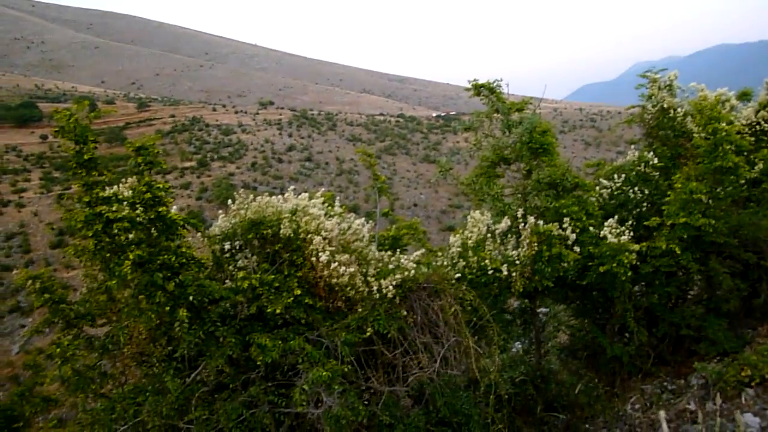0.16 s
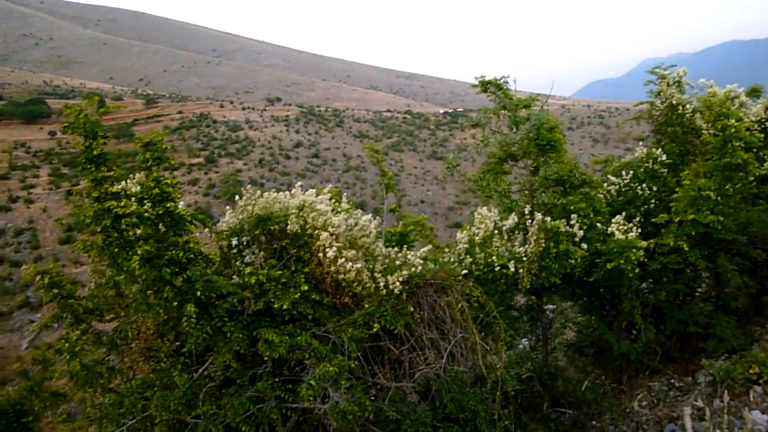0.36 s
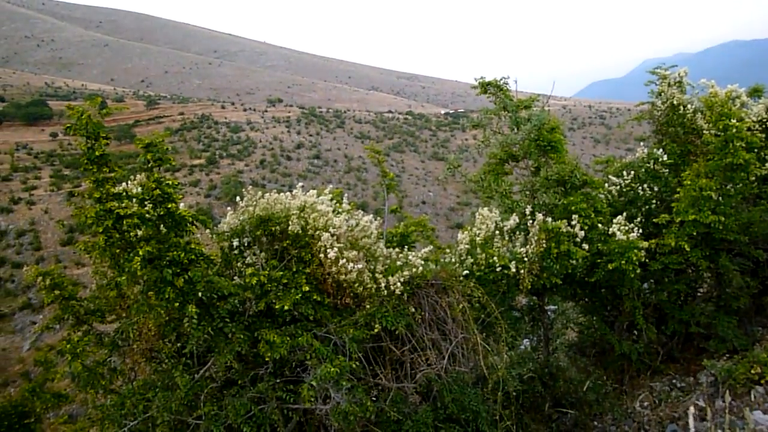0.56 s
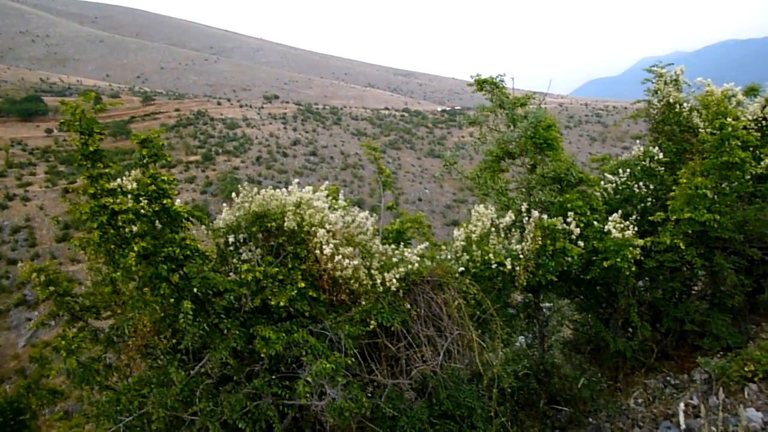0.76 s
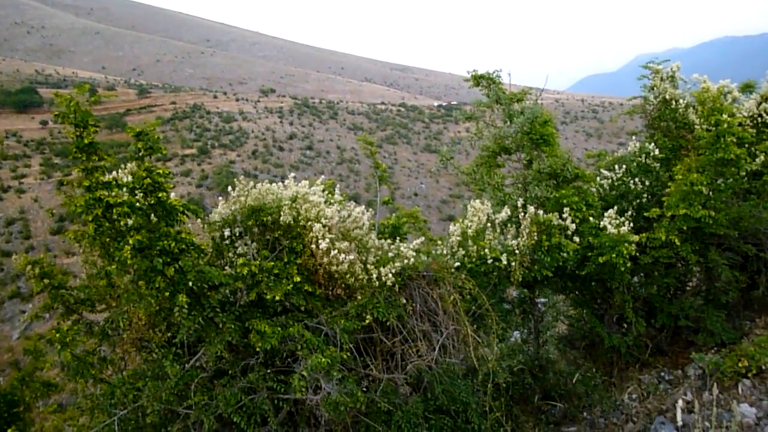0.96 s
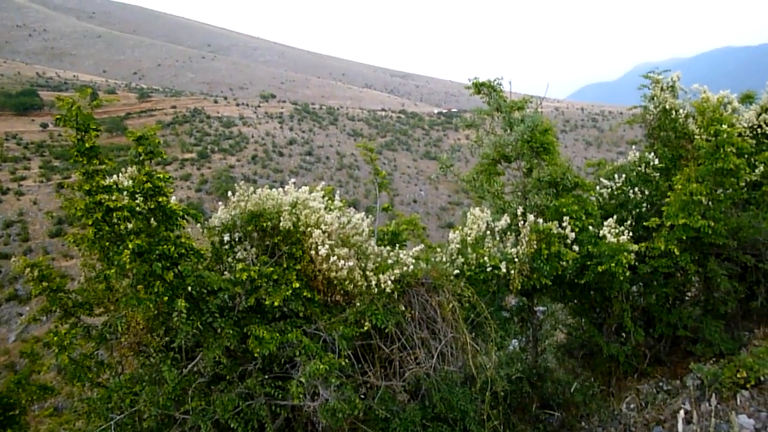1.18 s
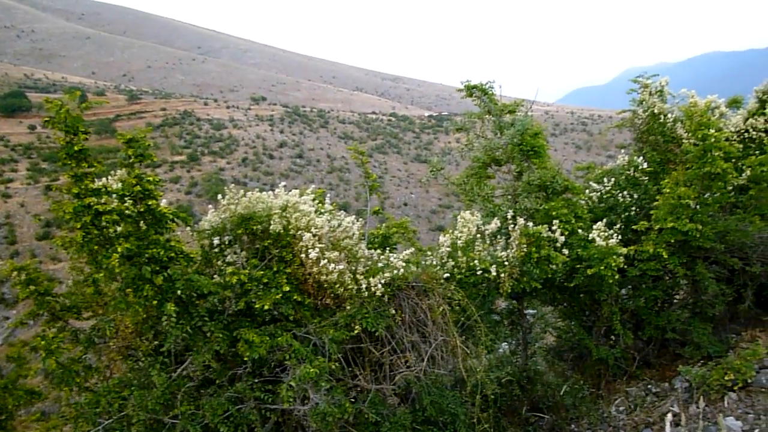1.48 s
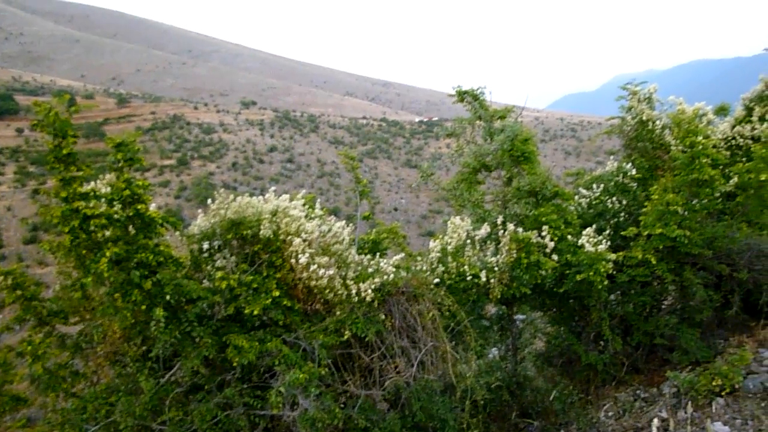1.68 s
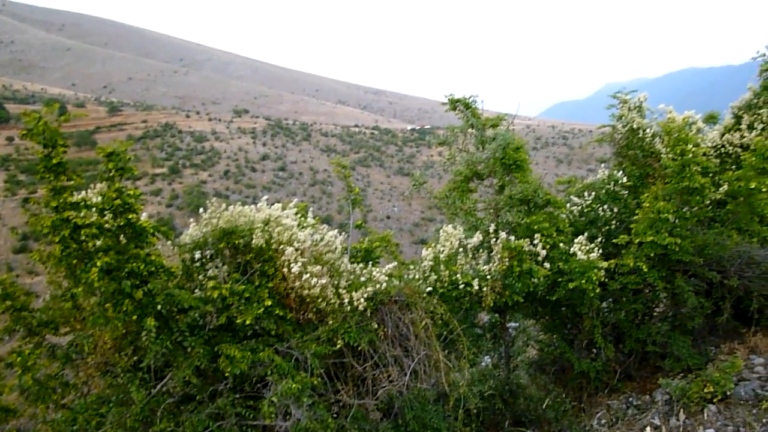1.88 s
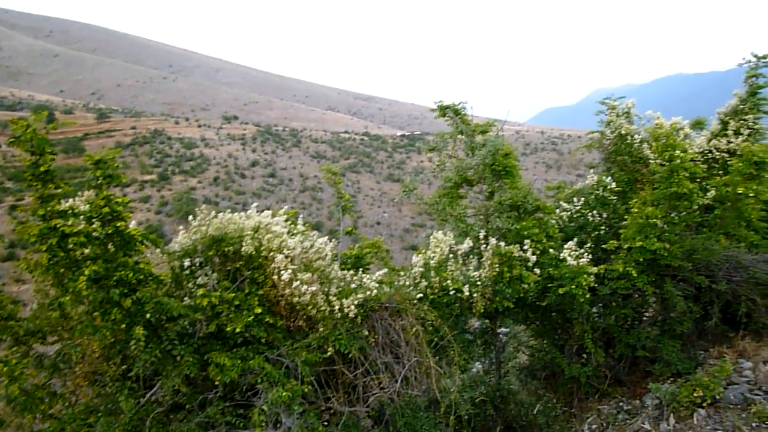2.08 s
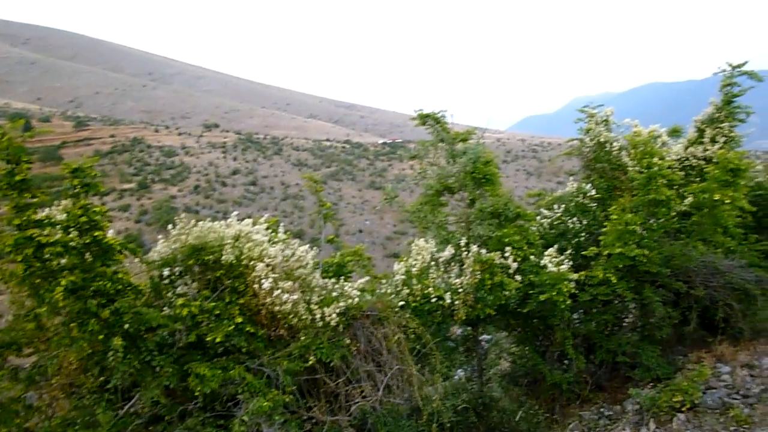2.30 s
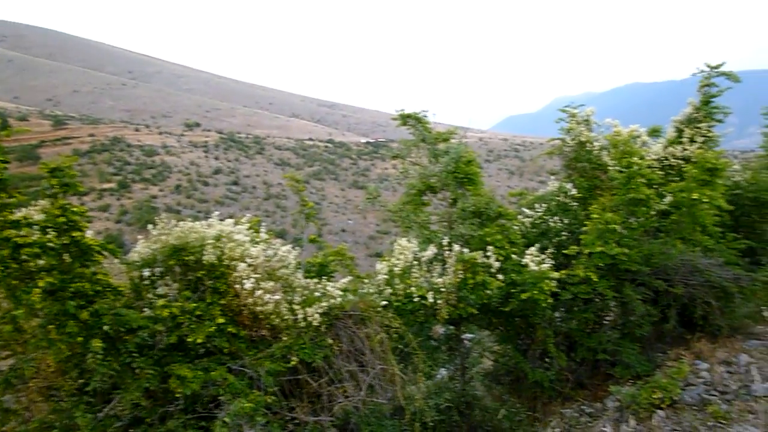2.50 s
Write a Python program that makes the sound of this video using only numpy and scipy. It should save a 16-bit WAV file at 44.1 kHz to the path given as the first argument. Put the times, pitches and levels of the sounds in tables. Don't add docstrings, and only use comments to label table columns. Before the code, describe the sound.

Low, fluttering wind rumble thumps against an open microphone, with one knock and faint sheep bells

```python
import sys
import numpy as np
from scipy import signal
from scipy.fft import rfft, irfft
from scipy.io import wavfile
from scipy.ndimage import uniform_filter1d

SR = 44100
rng = np.random.default_rng(int(sys.argv[2]) if len(sys.argv) > 2 else 0)


def file_out(sig):
    cols = np.atleast_2d(sig).T
    lim = np.clip(cols, -1, 1)
    pcm = np.round(lim * 32767).astype(np.int16)
    wavfile.write(sys.argv[1], SR, pcm)


def elevation(decibels):
    levels = np.asarray(decibels, float)
    return 10 ** (levels / 20)


N = 116865
T = np.arange(N) / SR


def walk(rate_hz):
    hold = int(SR / rate_hz)
    steps = np.repeat(rng.standard_normal(N // hold + 1), hold)
    return 1.08 * uniform_filter1d(uniform_filter1d(steps, hold), hold)[:N]


def unit(x):
    return x / np.sqrt(np.mean(x ** 2))


# (frequency [Hz], level [dB])
WHINE_LINES = [(12625, -98), (13212, -96), (13333, -90.5), (13905, -95.5)]


def whine():
    return sum(elevation(db + 3.0 * walk(6.6)) * np.sin(2 * np.pi * hz * T) for hz, db in WHINE_LINES)


# (frequency [Hz], density [dB per Hz])
AIR_SPECTRUM = [(40, 2.5), (200, 1.5), (700, -0.5), (2000, -8.5), (4000, -13), (7000, -18.5),
                (10000, -21.5), (16000, -27.5)]


def air():
    level_db, flicker_db = -55.5, 0.6
    hz = np.arange(N // 2 + 1) * SR / N + 1
    table_hz, table_db = np.array(AIR_SPECTRUM).T
    density_db = np.interp(np.log(hz), np.log(table_hz), table_db)
    spectrum = rfft(rng.standard_normal(N)) * elevation(density_db)
    hiss, shared = 0, walk(9.32)
    for octave in range(5, 15):
        share = np.clip(1 - abs(np.log2(hz) - octave), 0, 1)
        band = irfft(spectrum * share, N)
        hiss = hiss + band * elevation(flicker_db * (shared + 0.7 * walk(8)))
    return elevation(level_db) * unit(hiss)


# (time [s], level [dB])
GAIN_CURVE = [(0, -68), (.33, -67.5), (.42, -66.5), (.46, -71.5), (.7, -71.5), (.72, -74), (1, -71),
              (1.23, -72.5), (1.4, -74.5), (1.7, -71), (2.05, -70), (2.4, -68), (2.65, -67)]


def recorder_gain():
    return elevation(np.interp(T, *np.array(GAIN_CURVE).T) + 70)


def ring(start_s, hz, db, t60_s):
    t = np.maximum(T - start_s, 0)
    onset = np.minimum(t / 0.0016, 1)
    return elevation(db - 60 * t / t60_s) * np.sin(2 * np.pi * hz * t) * onset


# (frequency [Hz], level [dB], t60 [s])
BELL_PARTIALS = [(3457, -3, 1.5), (3578, -9, .6), (3720, 2, .035), (3950, 1, .035), (6468, 0, .22),
                 (6452, -9, .22), (7063, -20, .3), (9560, -12, .14), (10150, -11, .14)]
# (time [s], level [dB])
BELL_STROKES = [
    (.998, -56),
]


def near_bell():
    out = 0
    for start_s, hit_db in BELL_STROKES:
        damp = np.clip((start_s + 0.165 - T) / 0.02, 0, 1)
        for hz, db, t60_s in BELL_PARTIALS:
            out = out + ring(start_s, hz, db + hit_db, t60_s) * damp
    return out


# (time [s], frequency [Hz], level
# [dB], t60 [s])
FAR_PARTIALS = [(.07, 1405, -62, .6), (.24, 1324, -65, .3), (1.185, 3578, -66, .35), (1.22, 6468, -68, .12),
                (1.94, 815, -62, .3), (2.015, 1365, -57, .7), (2.215, 4553, -67, .5), (2.45, 1174, -63, .5),
                (2.49, 830, -62, .3)]


def far_bells():
    return sum(ring(*row) for row in FAR_PARTIALS)


def eddies(when_s, db, ms, lean):
    at = np.round(when_s * SR).astype(int)[:, None] + np.arange(-512, 512)
    u = (at / SR - when_s[:, None]) * 1000 / ms[:, None]
    shape = -elevation(db)[:, None] * (1 + np.reshape(lean, (-1, 1)) * u) * np.exp(-u ** 2 / 2)
    return np.bincount(np.clip(at + 1, 0, N + 1).ravel(), shape.ravel(), N + 2)[1:N + 1]


def knock():
    knock_s, highpass_hz = 0.7029, 500
    tick = eddies(np.full(2, knock_s), np.array([-37, -25]), np.array([0.055, 0.16]), 0)
    shove = eddies(np.array([knock_s - 0.001]), np.array([-13.]), np.array([0.55]), 0)
    return signal.sosfilt(signal.butter(1, highpass_hz, "high", fs=SR, output="sos"), tick) - shove


# (time [s], length [s], level [dB])
WIND_PUFFS = [(0, 0.025, -40.5), (0.094, 0.044, -40), (0.126, 0.076, -33.5), (0.209, 0.043, -22),
              (0.267, 0.038, -31), (0.28, 0.12, -37), (0.373, 0.028, -25), (0.422, 0.068, -20.5),
              (.5, 0.36, -23), (0.869, 0.19, -23), (1.07, 0.052, -20), (1.126, 0.07, -27.5),
              (1.199, 0.075, -19), (1.269, .18, -22.5), (1.456, 0.039, -32.5), (1.514, .18, -23.5),
              (1.698, 0.048, -35.5), (1.73, 0.049, -27.5), (1.784, 0.061, -37), (1.92, 0.029, -39),
              (1.826, 0.081, -27.5), (1.909, 0.051, -34.5), (1.956, 0.056, -31), (1.997, 0.026, -24),
              (2.043, .14, -24), (2.194, 0.014, -27.5), (2.228, .15, -25.5), (2.434, 0.046, -36),
              (2.586, 0.018, -34), (2.596, 0.043, -38)]


def gust_db():
    rise_s, fall_s, calm_db = 0.0079, 0.017, -57
    power = elevation(calm_db) ** 2
    for start_s, hold_s, db in WIND_PUFFS:
        rise = (1 + np.tanh((T - start_s) / rise_s)) / 2
        fall = (1 + np.tanh((start_s + hold_s - T) / fall_s)) / 2
        power = power + (elevation(db) * rise * fall) ** 2
    return 10 * np.log10(power)


def sway(gust):
    level_db, lowpass_hz = -3, 65
    lowpass = signal.butter(4, lowpass_hz, fs=SR, output="sos")
    rumble = unit(signal.sosfilt(lowpass, rng.standard_normal(N)))
    return elevation(uniform_filter1d(gust, int(0.018 * SR)) + level_db + 2.0 * walk(12)) * rumble


# (time [s], peak level [dB], width [ms])
MORE_SUCTIONS = [(0.2414, -18, 2.57), (0.5122, -21.5, 2.3), (0.567, -20.5, 2.1), (1.1972, -13, 4),
                 (1.2831, -19.5, 2.5), (1.317, -16, 1.6), (1.4338, -19, 2.6), (1.564, -18, 1.74),
                 (1.5743, -15, 2.6), (1.6242, -15.5, 3.4), (1.64, -17, 2.23), (1.865, -17.5, 3.65),
                 (2.003, -23, 2.57), (2.0745, -15.5, 4.2), (2.143, -13.5, 3.8), (2.2372, -13.5, 2.9),
                 (2.2579, -19.5, 1.9), (2.2847, -17, 2.65), (2.3527, -13, 3.6)]
# (time [s], peak level [dB], width [ms])
SUCTIONS = [(0.3845, -13, 4), (0.4403, -7.5, 2.55), (0.457, -13.5, 3.7), (0.4849, -11.5, 2.6),
            (0.5894, -9.5, 2.22), (0.6407, -14, 1.9), (0.6634, -9.5, 2.47), (0.7033, -2.5, 1.38),
            (0.7376, -9.5, 2.4), (0.7662, -11.5, 1.71), (0.7988, -12.5, 1.3), (0.813, -11.5, 1.82),
            (0.8362, -17, 1.82), (0.9129, -11.5, 2.32), (0.9617, -18.5, 4.3), (1.0107, -7, 1.66),
            (1.0319, -9.5, 2.1), (1.1082, -16.5, 2.4), (1.2354, -8.5, 3.7), (1.2514, -12.5, 2.16),
            (1.3505, -9.5, 1.55), (1.3676, -13.5, 1.8), (1.3796, -13.5, 1.94), (1.5333, -13, 3.43),
            (1.607, -17.5, 2.34), (1.6895, -9, 2.3), (2.052, -11, 2.21), (2.1563, -19.5, 1.75),
            (2.1708, -13.5, 2.74), (2.3077, -12, 2.33)]
# (time [s], peak level [dB], width [ms])
ROLLING = [(0.4277, -15, 2.65), (0.5551, -18.5, 1.9), (0.6147, -14, 2.73), (0.6293, -20, 2.3),
           (0.781, -16, 2.35), (0.8714, -22.5, 2.3), (0.9015, -17.5, 2.33), (0.928, -14.5, 2.3),
           (0.9966, -19.5, 3.9), (1.0762, -15, 2.6), (1.088, -13.5, 1.71), (1.2207, -19, 1.73),
           (1.3988, -18, 2.04)]
SUCTION_LEAN = 2.6


def large_eddies():
    edge_db, edge_share = -26.5, 0.49
    # rows, gain dB, width share, delay s, lean
    kinds = [(SUCTIONS + MORE_SUCTIONS, -6.7, 0.42, -0.0005, SUCTION_LEAN),
             (ROLLING, -22, 0.4, 0.001, 30)]
    out = 0
    for rows, gain_db, share, delay_s, lean in kinds:
        when_s, db, ms = np.array(rows).T
        out = out + eddies(when_s + delay_s, db + gain_db, ms * share, lean)
        out = out + eddies(when_s + delay_s, db + gain_db + edge_db, ms * share * edge_share, lean)
    return out


def small_eddies(gust, count=420):
    wake_s, push_rarity = 0.005, 0.6
    level_db, scatter_db = -4.5, 3.5
    width_ms, width_spread, narrow_per_db, lean_spread = 1.197, 0.28, 0.0874, 0.91
    when_s = (np.arange(count) + rng.random(count)) * T[-1] / count
    large_s = np.array(SUCTIONS + MORE_SUCTIONS + ROLLING)[:, 0]
    free = abs(when_s[:, None] - large_s).min(1) > wake_s
    when_s = when_s[free]
    width_draw, level_draw, lean_draw, push_draw = rng.standard_normal((count, 4))[free].T
    local_db = np.interp(when_s, T, gust)
    ms = width_ms * np.exp(width_spread * np.clip(width_draw, -1.5, 2) - narrow_per_db * (local_db + 24))
    db = local_db + level_db + scatter_db * np.minimum(level_draw, 1)
    lean = lean_spread * lean_draw + SUCTION_LEAN
    push = push_draw > push_rarity
    pull = ~push
    pulls = eddies(when_s[pull], db[pull], ms[pull], lean[pull])
    return pulls - eddies(when_s[push], db[push], ms[push], lean[push])


def wind():
    gust = gust_db()
    return sway(gust) + small_eddies(gust) + large_eddies()


def scene():
    background = recorder_gain() * (air() + whine())
    return (background + far_bells() + near_bell() + knock() + wind())[None]


def microphone(x):
    w, cut_q = 2 * np.pi * 84.7, 1.06
    flutter_hz, flutter_q, flutter_db = 187, 2.5, -10
    top_hz, overload = 15650, 1.3
    x = signal.lfilter(*signal.bilinear([1, 0, 0], [1, w / cut_q, w * w], SR), x)
    x = signal.sosfilt(signal.butter(2, 21, "high", fs=SR, output="sos"), x)
    x = x + elevation(flutter_db) * signal.lfilter(*signal.iirpeak(flutter_hz, flutter_q, SR), x)
    x = signal.sosfilt(signal.ellip(8, 0.2, 60, top_hz, fs=SR, output="sos"), x)
    return overload * np.tanh(x / overload)


# (frequency [Hz], width [Hz])
HOUSING_NOTCHES = [(3000, 1370), (5190, 860), (11630, 2000)]


def housing(x):
    for hz, width_hz in HOUSING_NOTCHES:
        x = signal.lfilter(*signal.iirnotch(hz, hz / width_hz, SR), x)
    return x


def roll_off(x):
    return signal.sosfilt(signal.butter(12, 15650, fs=SR, output="sos"), x)


def record(dry):
    return roll_off(housing(microphone(dry)))


dry = scene()
out = record(dry)
file_out(out)
```